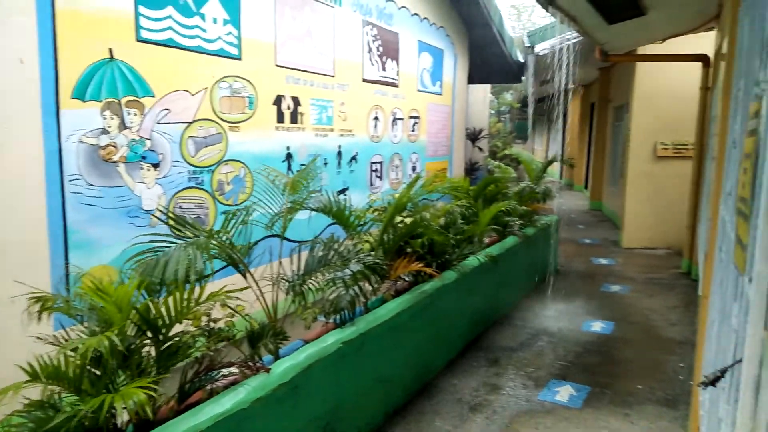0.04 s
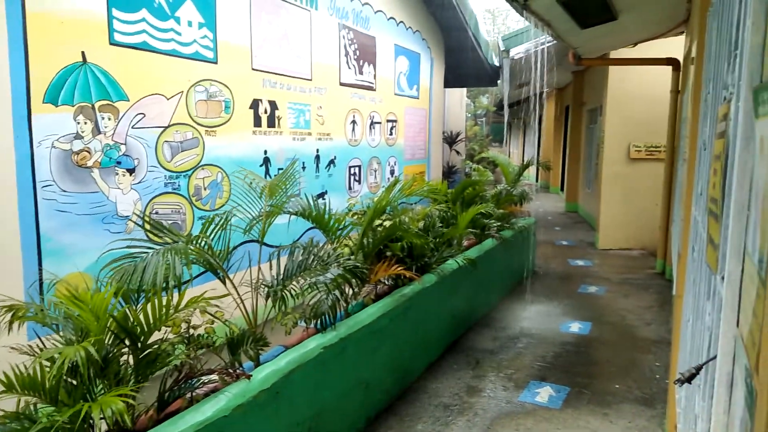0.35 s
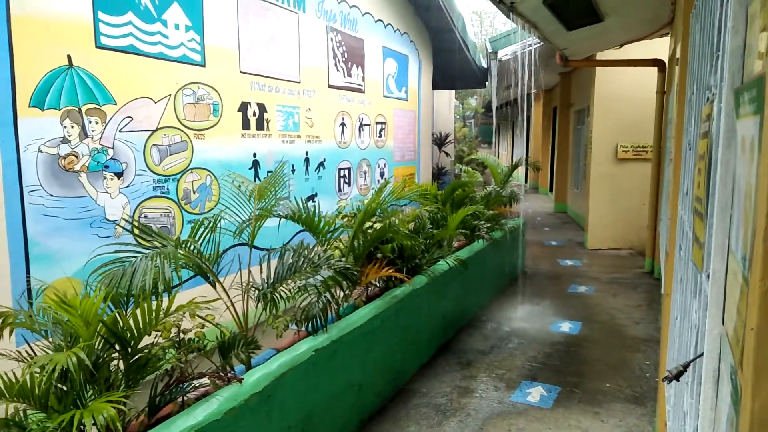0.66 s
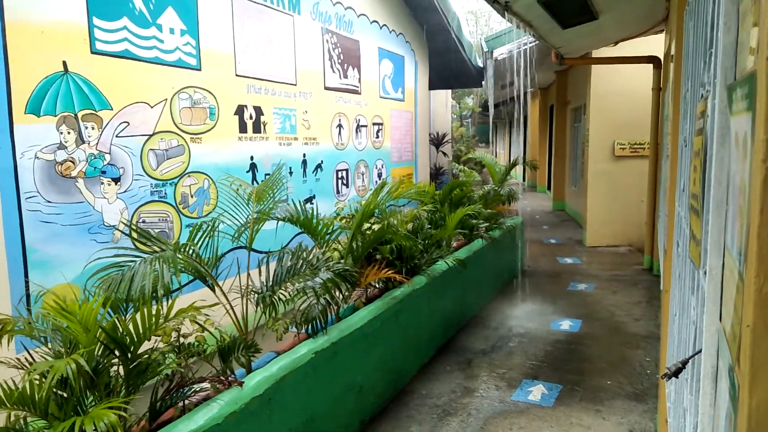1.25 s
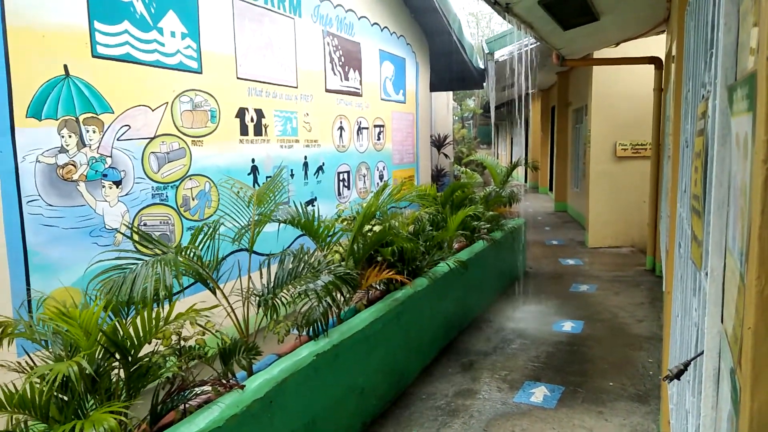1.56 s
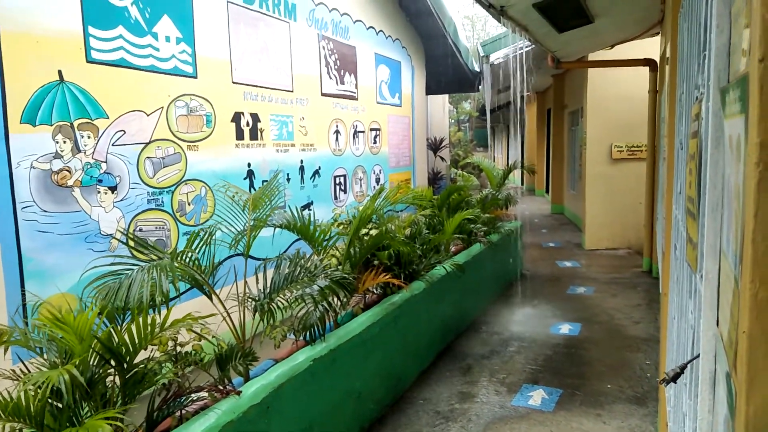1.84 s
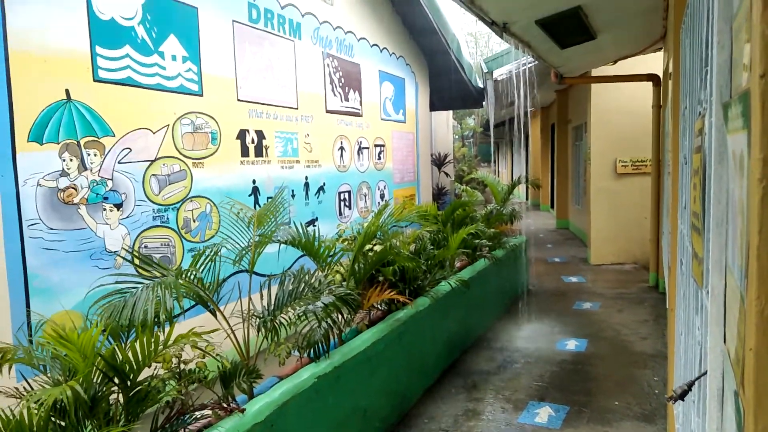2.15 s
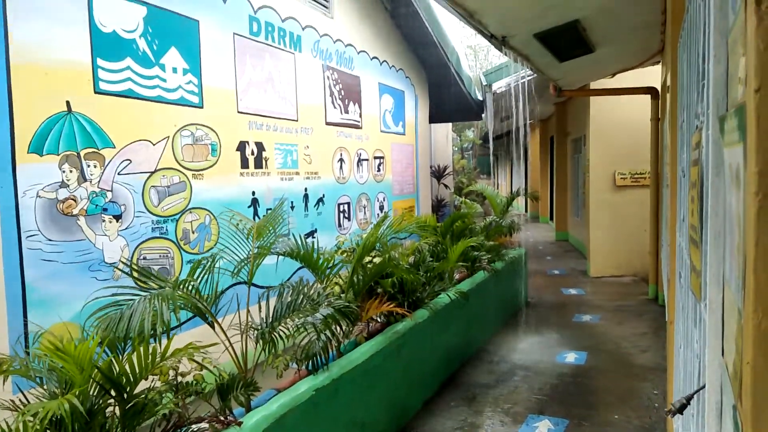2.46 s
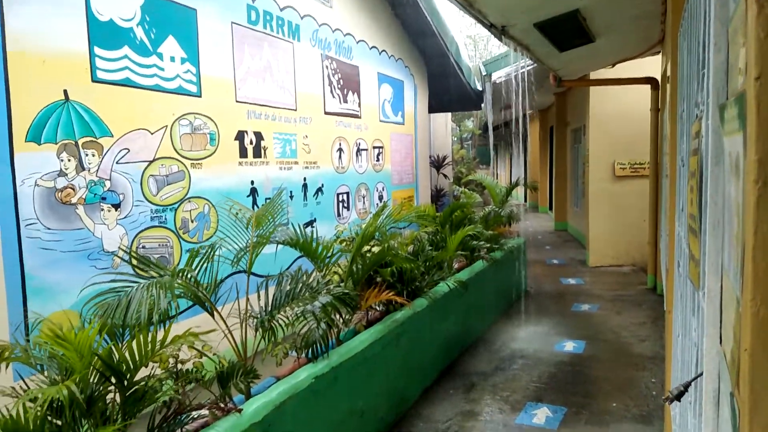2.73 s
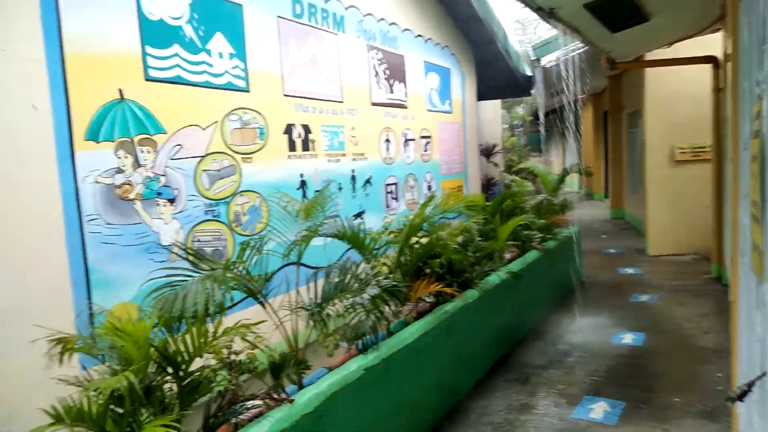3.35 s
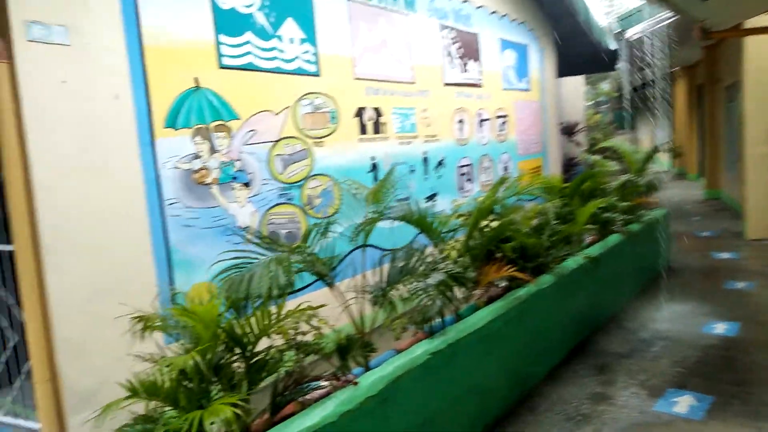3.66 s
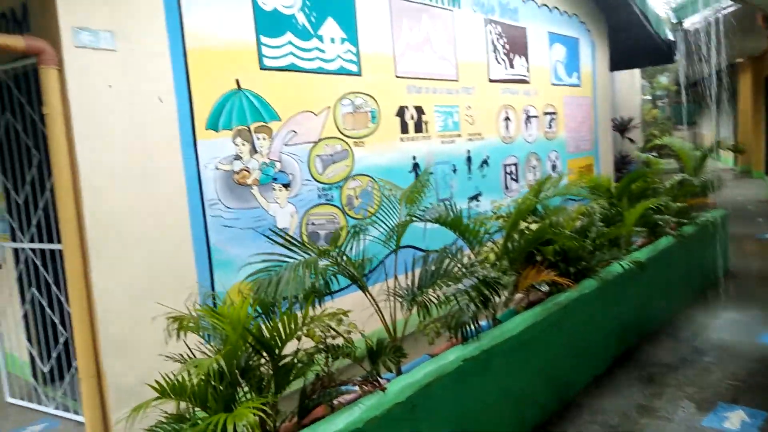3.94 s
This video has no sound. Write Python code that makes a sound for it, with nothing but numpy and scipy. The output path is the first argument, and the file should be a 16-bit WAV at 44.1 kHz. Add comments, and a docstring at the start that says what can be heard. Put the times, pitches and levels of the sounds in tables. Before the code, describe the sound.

Heavy rain drums on roofs while runoff splashes steadily onto wet concrete.

```python
"""Concrete walkway between two buildings, in heavy rain.
Rain drums on the roofs all around. Ropes of runoff break into lumps that slap the wet concrete,
leaving tiny bubbles and a fine spray. A few drops slap, pat and tick close by.
Smooth noise mixed with the impacts stands for far drops and the blur of the walls."""
import sys
import numpy as np
from scipy import signal
from scipy.fft import rfft, irfft
from scipy.io import wavfile
from scipy.ndimage import uniform_filter1d, minimum_filter1d

SR = 44100
rng = np.random.default_rng(int(sys.argv[2]) if len(sys.argv) > 2 else 0)


def int16_out(signal):
    """Quantize to a 16-bit WAV file."""
    q = np.round(np.clip(np.atleast_2d(signal).T, -1, 1) * 32767)
    wavfile.write(sys.argv[1], SR, q.astype(np.int16))


N = 176400  # 4 s

# water on concrete: (frequency [Hz], relative density [dB])
SPLASH_SPECTRUM = [(1000, -51), (1700, -12.5), (2100, -1.5), (3160, 1), (3760, -3.5), (4160, -11.5),
                   (4630, -24.5), (5000, -45.5), (6500, -50), (11000, -120)]
# fine spray: (time [s], relative level [dB])
SPRAY_ENVELOPE = [(0, -48.5), (0.3, -44.5), (0.68, -43.5), (0.82, -40), (1.0, -41), (1.65, -38.9),
                  (1.8, -40.5), (2.55, -38.4), (2.85, -39.5), (3.5, -37), (3.75, -41.5), (4, -40.5)]


def from_db(db):
    """Decibels to gain."""
    return 10 ** (np.asarray(db) / 20)


def unit_rms(x):
    """Scale to rms 1."""
    return x / np.sqrt(np.mean(x ** 2) + 1e-20)


def gain_curve(rows):
    """Gain per sample from (time [s], level [dB]) rows."""
    time_s, db = np.transpose(rows)
    return from_db(np.interp(np.arange(N) / SR, time_s, db))


def drift(corner_hz):
    """Slow random wander, rms about 1."""
    hop, settle = 40, 2000
    pole = np.exp(-2 * np.pi * corner_hz * hop / SR)
    noise = rng.standard_normal(N // hop + settle + 2)
    slow = signal.lfilter([1], [1, -2 * pole, pole * pole], noise)[settle:]
    return np.interp(np.arange(N) / hop, np.arange(len(slow)), unit_rms(slow))


def coloured(x, spectrum):
    """Minimum-phase filter from (frequency [Hz], gain [dB]) rows; output rms 1."""
    hz, db = np.transpose(spectrum)
    grid_hz = np.maximum(np.fft.rfftfreq(N, 1 / SR), 1)
    magnitude = from_db(np.interp(np.log(grid_hz), np.log(hz), db))
    cepstrum = irfft(np.log(magnitude), N)
    response = np.exp(rfft(2 * cepstrum[:N // 2], N))
    return unit_rms(irfft(rfft(x) * response, N))


def impacts(per_s, spread_db):
    """Randomly timed clicks, many small, few large; rms 1."""
    sizes = from_db(spread_db * np.minimum(rng.exponential(1, N), 5))
    return unit_rms(sizes * rng.choice([-1, 1], N) * (rng.random(N) < per_s / SR))


def with_wash(drops, wash_share):
    """Distinct drops over the noise of countless far ones, mixed by power."""
    return np.sqrt(1 - wash_share) * drops + np.sqrt(wash_share) * rng.standard_normal(N)


def clicks_at(rows):
    """One click per (time [s], level [dB]) row."""
    time_s, db = np.transpose(rows)
    return np.bincount((time_s * SR).astype(int), from_db(db), N)[:N]


def decay(clicks, decay_s):
    """Each click starts an exponential decay."""
    return signal.lfilter([1], [1, -np.exp(-1 / (decay_s * SR))], clicks + 1e-18)


def ring(drive, hz, decay_s):
    """Damped resonator."""
    radius, angle = np.exp(-1 / (decay_s * SR)), 2 * np.pi * hz / SR
    return signal.lfilter([0, np.sin(angle)], [1, -2 * radius * np.cos(angle), radius ** 2], drive + 1e-18)


def rain():
    """Drops drum on the roofs and the yard."""
    # drumming: (time [s], relative level [dB])
    envelope = [(0, -29), (0.6, -26.5), (1.35, -23.5), (1.6, -23), (1.9, -24), (2.45, -23), (2.9, -23),
                (3.45, -22.5), (4, -25.1)]
    # drumming: (frequency [Hz], relative density [dB])
    spectrum = [(18, -52), (30, -25.5), (114, -2), (263, -3.5), (420, -2), (744, -6.5), (1070, -1.5),
                (1390, -2.5), (1900, -3), (2470, -9.5), (4180, -120)]
    drops = with_wash(impacts(per_s=3000, spread_db=3), wash_share=0.7)
    return from_db(1) * gain_curve(envelope) * coloured(drops, spectrum)


def spray():
    """Fine droplets fall back in uneven puffs."""
    # spray hiss: (frequency [Hz], relative density [dB])
    spectrum = [(2760, -34), (4700, -3), (5120, -2.5), (8030, -8), (11300, -6), (13800, -9.5), (15600, -16)]
    droplets = with_wash(impacts(per_s=6400, spread_db=2.5), wash_share=0.74)
    flicker = from_db(0.74 * drift(corner_hz=25))
    return from_db(0.5) * gain_curve(SPRAY_ENVELOPE) * coloured(droplets * flicker, spectrum)


def ticks():
    """Droplets shatter on something hard with a thin sizzle: a few clear, many faint."""
    # clear ticks: (time [s], relative level [dB])
    tick_hits = [(0.396, -38), (0.7337, -24), (0.8344, -29), (1.5313, -27), (2.5474, -35), (3.3039, -23),
                 (3.3982, -23), (3.5139, -33)]
    bandwidth_hz, decay_s = 900, 0.0057
    sizzle = unit_rms(ring(rng.standard_normal(N), hz=11240, decay_s=1 / (np.pi * bandwidth_hz)))
    faint = unit_rms(decay(np.abs(impacts(per_s=70, spread_db=2)), decay_s))
    clear = decay(clicks_at(tick_hits), decay_s)
    return sizzle * (from_db(-8.5) * clear + from_db(-13.5) * gain_curve(SPRAY_ENVELOPE) * faint)


def near_drops():
    """Close drops slap the ground; heavy ones land with a dull pat."""
    # slaps: (time [s], relative level [dB])
    slap_hits = [(0.0283, -7.5), (0.032, -14), (0.040, -11), (0.622, -9)]
    # pats: (time [s], relative level [dB])
    pat_hits = [(0.0805, -9), (0.1545, -14)]
    slap_envelope = uniform_filter1d(decay(clicks_at(slap_hits), decay_s=0.0011), size=30)
    slaps = slap_envelope * coloured(rng.standard_normal(N), SPLASH_SPECTRUM)
    pats = ring(clicks_at(pat_hits), hz=350, decay_s=0.00042)
    return slaps + 2 * pats


def bubbles():
    """Tiny puddle bubbles ring briefly, each at its own pitch."""
    per_s, low_hz, high_hz, t60_cycles = 300, 1052, 3760, 23
    t = np.arange(N // 100) / SR
    puddle = np.zeros(N + len(t))
    for when, pitch in rng.random((int(per_s * N / SR), 2)):
        hz = low_hz * (high_hz / low_hz) ** pitch
        envelope = from_db(-60 * t * hz / t60_cycles)
        start = int(when * N)
        puddle[start:start + len(t)] += envelope * np.sin(2 * np.pi * hz * t)
    return coloured(puddle[:N], SPLASH_SPECTRUM)


def runoff():
    """Lumps of water burst on the concrete into droplets and bubbles; the walls blur part to a wash."""
    # runoff flow: (time [s], relative level [dB])
    flow = [(0, -24), (0.2, -22), (0.27, -20.5), (0.38, -22), (0.95, -18), (1.28, -17), (1.45, -18.5),
            (1.63, -15.5), (1.85, -18.5), (2.13, -16), (2.28, -17), (2.48, -15.5), (2.86, -18), (3.1, -16),
            (3.42, -16), (3.55, -18), (3.65, -17.5), (4, -16.5)]
    # gushes from the roof edge: (time [s], boost [dB])
    gushes = [(0.04, 1), (0.65, 1.5), (1.73, 1.5), (3.0, 1.8), (3.13, 2), (3.3, 2), (3.54, 4.5)]
    gush_half_width_s = 0.035
    lump_power = decay(impacts(per_s=790, spread_db=1.5) ** 2, decay_s=0.0029)
    droplets = unit_rms(np.sqrt(lump_power) * impacts(per_s=14000, spread_db=1.15))
    splatter = coloured(with_wash(droplets, wash_share=0.52), SPLASH_SPECTRUM)
    t = np.arange(N) / SR
    gush_db = sum(db * np.exp(-((t - peak_s) / gush_half_width_s) ** 2) for peak_s, db in gushes)
    return gain_curve(flow) * from_db(gush_db - 0.22) * (splatter + from_db(-10.5) * bubbles())


def scene():
    """Mono mix under the eaves."""
    return (rain() + spray() + near_drops() + ticks() + runoff())[None]


def record(dry):
    """Fast peak limiter, then a steep low-pass."""
    ceiling, cutoff_hz = 0.7, 15720
    gain = np.minimum(1, ceiling / (np.abs(dry) + 1e-9))
    held_gain = minimum_filter1d(gain, size=177)
    smooth_gain = uniform_filter1d(uniform_filter1d(held_gain, size=89), size=89)
    lowpass = signal.ellip(12, 0.1, 90, cutoff_hz, fs=SR, output="sos")
    return signal.sosfilt(lowpass, smooth_gain * dry)


dry = scene()
out = record(dry)
int16_out(out)
```